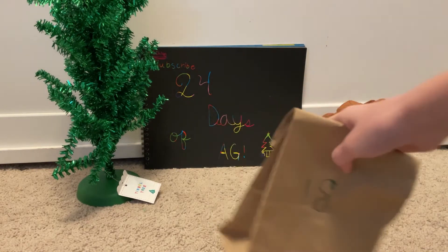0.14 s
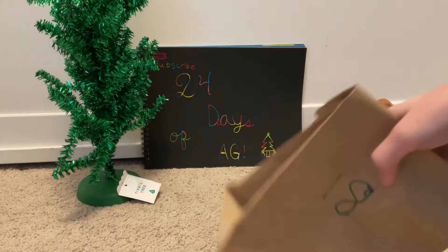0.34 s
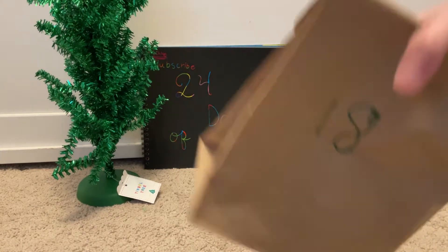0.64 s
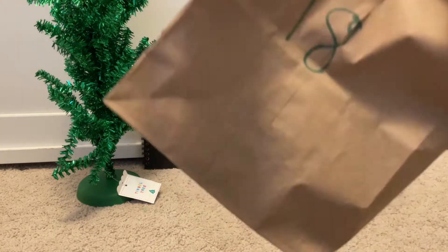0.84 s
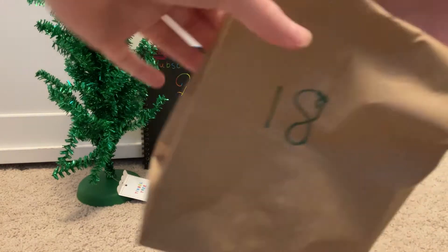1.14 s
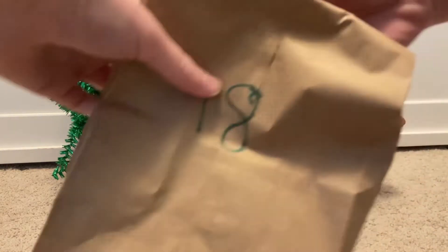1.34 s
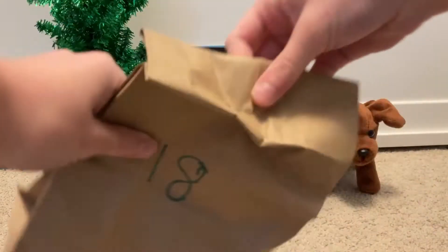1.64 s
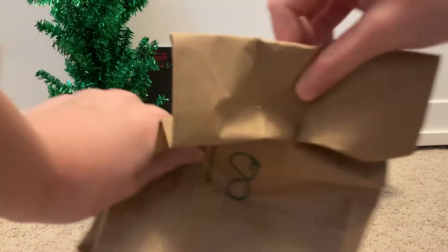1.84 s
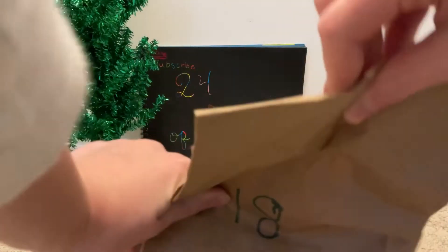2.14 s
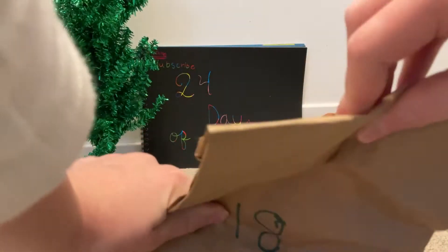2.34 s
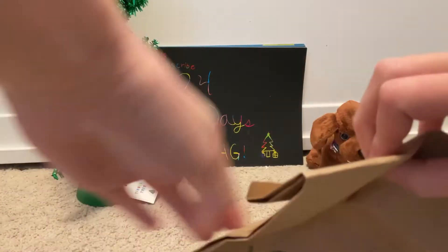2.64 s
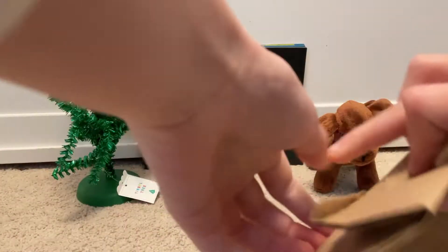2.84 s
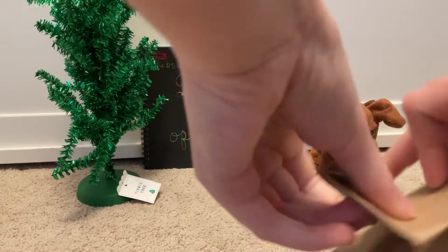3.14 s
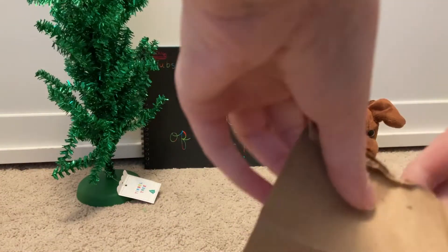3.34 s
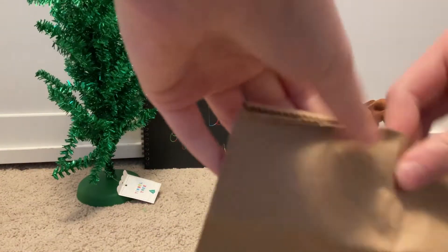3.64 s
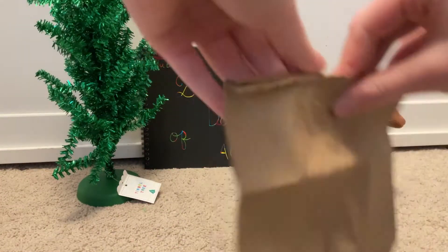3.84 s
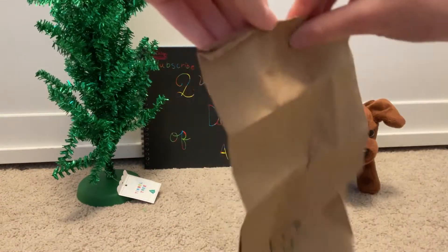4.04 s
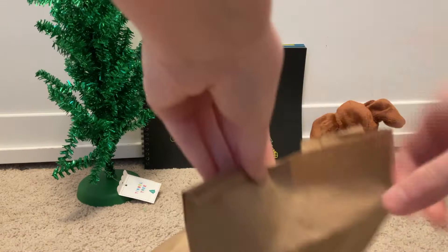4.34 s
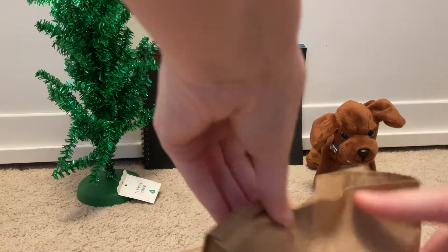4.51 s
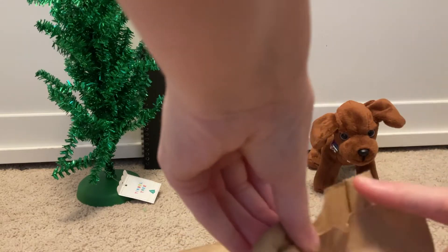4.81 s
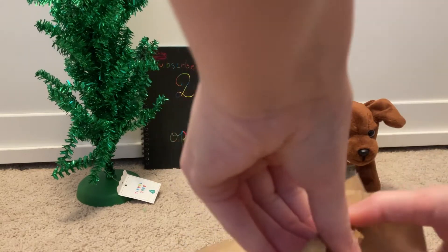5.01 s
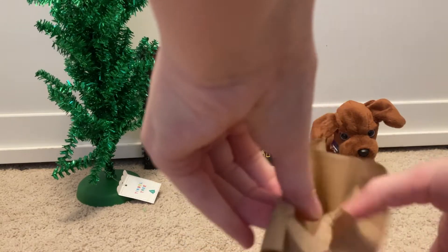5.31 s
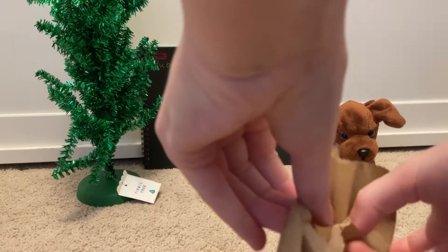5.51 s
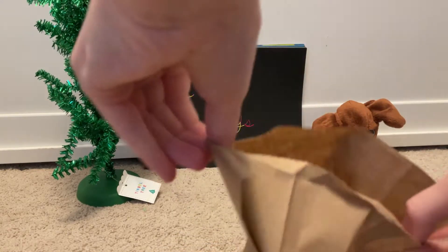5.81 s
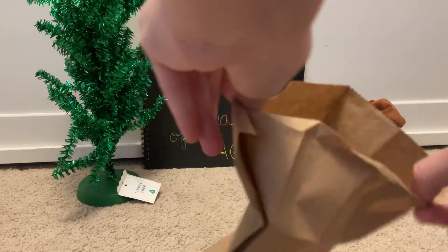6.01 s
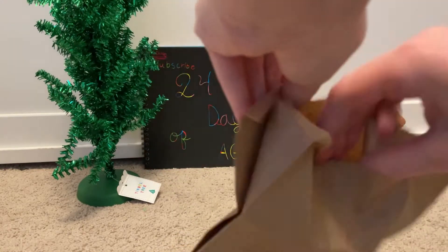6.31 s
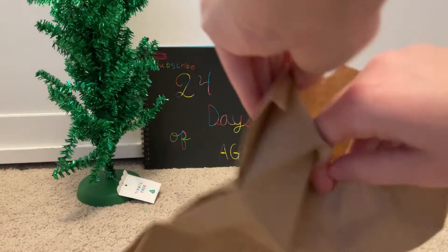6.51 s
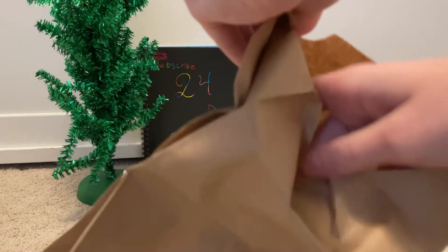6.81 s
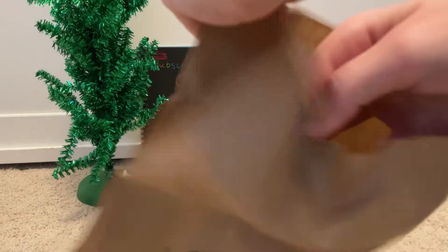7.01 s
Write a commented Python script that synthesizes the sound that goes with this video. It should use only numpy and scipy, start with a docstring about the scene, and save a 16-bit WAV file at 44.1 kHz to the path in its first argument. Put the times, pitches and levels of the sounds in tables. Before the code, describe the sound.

Hands pick up a paper bag with a light sliding hiss and scattered dry cracks. The crackle thickens as the top is unfolded, and the fold springs loose with one sharp snap. The bag is then pulled open in fits, with small crinkles, finger rubs and soft flaps, ending in a run of loud cracks. It is close to the microphone in a quiet, carpeted room.

```python
"""A brown paper bag, close to the microphone in a carpeted room. Hands pick it up with a sliding hiss, and
creases buckle in dry cracks that spread through the sheet as bending waves. The crackle thickens as the
top is unfolded, until at two seconds the fold springs loose with a sharp snap. The bag is then pulled
open in fits: small crinkles and finger strokes fill the gaps, the broad walls flap softly, and a last
run of loud cracks comes near seven seconds."""
import sys
import numpy as np
from scipy import signal
from scipy.fft import rfft, irfft
from scipy.io import wavfile

SR = 44100
rng = np.random.default_rng(int(sys.argv[2]) if len(sys.argv) > 2 else 0)


def generate_wav(signal):
    """Clip the signal to [-1, 1] and save it as 16-bit WAV at the path in sys.argv[1]."""
    frames = np.transpose(np.atleast_2d(signal))
    scaled = np.clip(frames, -1, 1) * 32767
    pcm = np.round(scaled).astype(np.int16)
    wavfile.write(sys.argv[1], SR, pcm)


N = 315932
TIME = np.arange(N) / SR
LEAD_S = .005  # a buckle starts to swell this long before its jump
CRISP_SPREAD_DB = 4.5  # the top octave varies this much between tiny buckles


def cracks(run_s=.0028, small_facet_hz=3200, neighbour_db=-17, neighbour_late_s=.009):
    """Creases give way, trailed by weak neighbours; small facets are crisp, broad ones jerk a panel."""
    # creases buckling: (time [s], level over 10 ms [dB], facet pitch [Hz])
    creases = [(0.1104, -27, 2650), (.141, -31, 2870), (0.194, -29, 2830), (0.2665, -28, 2850),
               (0.6408, -33.5, 3510), (0.821, -28, 1740), (0.854, -22.5, 3000), (.937, -26, 2540),
               (0.956, -25.5, 2150), (1.063, -33, 2650), (1.239, -31, 3000), (1.251, -25, 4460),
               (1.3399, -18.5, 2890), (1.3755, -18, 2900), (1.401, -19.5, 1900), (1.511, -33, 3400),
               (1.535, -28, 4470), (1.551, -24, 4700), (1.609, -26.5, 3640), (1.678, -23.5, 3850),
               (1.7131, -21, 2420), (1.762, -18, 1570), (1.794, -23.5, 3200), (1.7997, -24.5, 3600),
               (1.8433, -24.5, 1540), (1.869, -23, 4900), (1.88, -28, 1710), (1.897, -27.5, 2120),
               (1.945, -35, 1780), (1.993, -28, 3450), (2.1705, -40, 4180), (2.2092, -32, 1710),
               (2.2409, -22, 4430), (2.288, -27.5, 2200), (2.3002, -27, 2580), (2.3428, -23.5, 2950),
               (2.4078, -22.5, 3120), (2.451, -23.5, 3200), (2.5335, -33, 3250), (2.586, -25.5, 2840),
               (2.629, -34.5, 2680), (2.6908, -26, 4170), (2.7518, -35, 3520), (2.772, -28, 2450),
               (2.798, -26.5, 2300), (2.9054, -30.5, 2800), (2.9886, -27.5, 4000), (3.029, -31, 3900),
               (3.039, -28.5, 4200), (3.1414, -29, 3640), (3.3097, -24, 2450), (3.388, -30, 1680),
               (3.4965, -32, 3400), (3.529, -29.5, 2300), (3.57, -31, 1600), (3.629, -23, 3750),
               (3.641, -25.5, 4860), (3.66, -35, 3620), (3.7061, -31.5, 4010), (3.754, -24.5, 4000),
               (3.7828, -28, 3880), (3.792, -25, 3630), (3.8136, -26, 4180), (3.935, -40, 2010),
               (4.1325, -35, 3520), (4.1811, -37.5, 1720), (4.2574, -28.5, 2870), (4.273, -38, 3200),
               (4.354, -23.5, 5000), (4.392, -35, 3600), (4.487, -22.5, 3200), (4.503, -25, 3060),
               (4.5725, -19.5, 3070), (4.911, -29, 2630), (5.136, -29.5, 2680), (5.175, -30.5, 2940),
               (5.243, -27, 4270), (5.2675, -27.5, 4400), (5.3449, -30, 3710), (5.575, -32, 3800),
               (5.6168, -22, 3040), (5.638, -22.5, 2720), (5.646, -24.5, 3080), (5.663, -29.5, 2700),
               (5.706, -32.5, 2380), (5.784, -31.5, 2760), (5.8072, -33, 2040), (5.88, -28, 2840),
               (5.907, -27.5, 2770), (5.953, -34.5, 3250), (6.0116, -27, 2600), (6.148, -33, 2680),
               (6.187, -36.5, 3170), (6.266, -27, 3380), (6.307, -26, 4000), (6.3556, -20, 3570),
               (6.413, -26, 2480), (6.5601, -23.5, 3020), (6.589, -23, 3500), (6.599, -19, 3240),
               (6.6767, -23, 3040), (6.694, -16.5, 2990), (6.704, -18.5, 3430), (6.716, -20.5, 3000),
               (6.831, -22.5, 4400), (6.8627, -24, 2300), (6.968, -19.5, 3370), (7.0105, -15.5, 3250),
               (7.0443, -18.5, 3470), (7.0914, -26, 1670)]
    out = np.zeros(N)
    for s, db, hz in creases:
        broad = 1 / (1 + (hz / small_facet_hz) ** 9.2)  # near 0, the facet jumps almost at once
        crisp_db = 3.5 + 3.5 * np.log2(hz / small_facet_hz)
        knock_db = -39 + .8 * (db + 25)
        add(out, s - LEAD_S, from_db(db) * buckle(hz, run_s * broad, crisp_db))
        add(out, s, np.sqrt(broad) * from_db(knock_db) * panel_knock(hz))
        for late, pitch, crisp in rng.standard_normal((2, 3)):
            neighbour = buckle(hz * 2 ** (pitch / 3 - .5), run_s / 2, CRISP_SPREAD_DB * crisp, size=1024)
            add(out, s - LEAD_S + neighbour_late_s * abs(late), from_db(db + neighbour_db) * neighbour)
    return out


def buckle(hz, run_s, top_db, ring_s=.0013, tail_s=.013, facet_db=4, travel_s=.000746, size=2048):
    """One facet buckles: slips swell, the crease jumps and runs on, the sheet rings out."""
    # tone of cracking paper: (frequency [Hz], level [dB])
    paper_colour = [(60, -26.5), (150, -7.5), (300, -7), (1500, 1.5), (3000, -3), (5000, 1), (7000, -2.5),
                    (9800, -11.5), (13500, -1.5), (16000, -7.5)]
    t = np.arange(size) / SR - LEAD_S
    swell_s = .0012 * np.sqrt(run_s / .002) + 1e-5
    swell = np.exp(np.minimum(t, 0) / swell_s)
    after_s = np.maximum(t - run_s, 0)
    decay = np.exp(-after_s / ring_s) + from_db(-20) * np.exp(-after_s / tail_s)
    # waves scattered by the edges of the sheet have lost some treble; the jumps themselves keep it
    pulse = low_pass(from_db(-12) * swell * decay * rng.standard_normal(size), hz=7000)
    jumps = 1 + int(run_s / ring_s / 2)
    jump_s = LEAD_S + run_s * (np.arange(jumps) + rng.uniform(0, .46, jumps)) / jumps
    pulse[(jump_s * SR).astype(int)] += rng.choice([-1, 1], jumps)
    # a small facet radiates little below its own pitch, a large one little above
    low = low_pass(pulse, hz)
    low_gain = np.clip((2900 / hz) ** 2, .15, 3)
    facet = from_db(facet_db) * resonance(pulse, hz * rng.uniform(.8, 1.2), q=5)
    panel = from_db(-6) * resonance(pulse, hz * rng.uniform(.2, .5), q=5)
    radiated = low_gain * (low + panel) + (pulse - low) + facet
    # the crisper the fibres break, the more of the top octave
    colour = [(f, db + top_db * (f > 8000)) for f, db in paper_colour]
    return unit_burst(bend(coloured(radiated, colour), travel_s * rng.uniform(.5, 1.5)))


def panel_knock(facet_hz):
    """The panel beside a crease is jerked and rings briefly at a hollow pitch, well below the facet's."""
    hz = .211 * facet_hz * rng.uniform(.7, 1.3)
    ring = resonance(signal.unit_impulse(4096), hz, q=6.2)
    return unit_burst(bend(ring, delay_s=.002993))


def snap():
    """The fold tears free in a swelling avalanche of slips."""
    # the fold springing loose: (time [s], level [dB])
    envelope = [(2.005, -54), (2.009, -21.5), (2.014, -22), (2.024, -24.5), (2.028, -11), (2.040, -9),
                (2.043, -17.5), (2.052, -29), (2.062, -29), (2.085, -57)]
    # tone of the snap: (frequency [Hz], level [dB])
    snap_colour = [(60, -23), (250, -7), (750, 1.5), (2000, -2), (4500, -1.5), (9500, -12.5),
                   (14000, -11.5)]
    level_db, = in_time(envelope)
    running = (TIME > envelope[0][0]) & (TIME < envelope[-1][0])
    slips = coloured(clicks(per_s=5000, spread_db=5), snap_colour)
    return running * from_db(level_db) * rms_one(bend(slips, delay_s=.00094))


def pings(t60=.015):
    """A facet held taut cracks and rings on at one pitch."""
    # the taut facet: (time [s], level over 10 ms [dB], pitch [Hz])
    taut_facets = [(1.0148, -28, 3340),]
    out, t = np.zeros(N), TIME[:SR // 10]
    for s, db, hz in taut_facets:
        ring = np.sin(2 * np.pi * hz * t) * from_db(-60 * t / t60)
        add(out, s - LEAD_S, from_db(db - 4) * buckle(hz, run_s=.00078, top_db=-1))
        add(out, s, from_db(db) * unit_burst(ring))
    return out


def crinkles(rustle_db, low_hz=1200, high_hz=4300, facets=40):
    """Tiny buckles cluster, each at its facet's pitch; harder handling makes them denser and brighter."""
    per_s = 200 * from_db(.3 * (rustle_db + 38))
    slips = clicks(per_s, spread_db=4) * from_db(rustle_db) * grip(rough_db=1.5)
    rings = []
    for hz in np.geomspace(low_hz, high_hz, facets):
        ring = buckle(hz, run_s=rng.uniform(0, .0036), top_db=rng.normal(.5, CRISP_SPREAD_DB), facet_db=9)
        rings.append(ring / np.linalg.norm(ring))
    out, facet_at = np.zeros(N), rng.integers(facets, size=N)
    for at in np.flatnonzero(slips):
        add(out, max(at / SR - LEAD_S, 0), slips[at] * rings[facet_at[at]])
    soft = low_pass(out, high_hz)
    brightness = np.minimum(from_db(.8 * (rustle_db + 40)), 1)
    return soft + brightness * (out - soft)


def sliding(rustle_db, panel_hz=755):
    """Fibres catch and hiss: fingers make the held panel sing, paper rubs on paper in duller fits."""
    # fingers sliding over the paper: (peak time [s], level [dB], time to rise 10 dB [s])
    strokes = [(0.05, -41.5, 0.44), (0.36, -39.5, 0.12), (2.9, -41, .1), (3.1, -41.5, 0.16),
               (4.115, -41.5, 0.09), (4.47, -34, .07), (5.06, -35.5, 0.21), (5.54, -40, 0.13),
               (6.48, -36, 0.21), (6.93, -41.5, 0.2)]
    # tone of the hiss: (frequency [Hz], level [dB])
    hiss_colour = [(100, -19), (400, 3.5), (4500, 6), (9500, -9), (14000, 1)]
    hiss = rms_one(coloured(clicks(per_s=5000, spread_db=5), hiss_colour))
    singing = from_db(6) * resonance(hiss, panel_hz, q=12)
    stroked = swells(strokes, release_share=.62, roundness=1.28) * (hiss + singing)
    rubbed = from_db(-50 + .7 * (rustle_db + 38)) * low_pass(hiss, hz=5500)
    return grip(rough_db=3) * stroked + grip(rough_db=4) * rubbed


def wall_flutter(flutter_db):
    """The broad sides of the bag flutter and knock as long as it is handled."""
    # tone of the fluttering sides: (frequency [Hz], level [dB])
    flutter_colour = [(35, -54), (70, -8), (140, -4), (300, -1), (750, -3), (4000, -48)]
    slips = coloured(clicks(per_s=180, spread_db=4.5), flutter_colour)
    flutter = rms_one(bend(slips, delay_s=.002005))
    return from_db(flutter_db) * (from_db(-2.5) * flutter + from_db(-4) * wall_knocks())


def wall_knocks(low_hz=290, high_hz=800, panels=14):
    """Each slip of a wall makes one stiff panel ring briefly at a hollow pitch of its own; rms 1."""
    slips = clicks(per_s=110, spread_db=6.5)
    panel_at = rng.integers(panels, size=N)
    pitches = np.geomspace(low_hz, high_hz, panels)
    rings = (resonance(slips * (panel_at == k) + 1e-18, hz, q=8.5) for k, hz in enumerate(pitches))
    return rms_one(sum(rings))


def wall_flaps(ring_s=.0046, size=4096):
    """Now and then a wall of the bag flips over with a soft falling thud."""
    # walls flipping: (time [s], level over 10 ms [dB])
    flaps = [(.478, -31), (0.499, -36.5), (0.548, -33), (1.056, -33.5), (2.033, -21.5), (3.304, -35),
             (5.638, -29.5), (6.715, -38), (6.959, -30.5), (7.087, -30.5)]
    # tone of the thud: (frequency [Hz], level [dB])
    thud_colour = [(32, -41), (70, -1), (260, -1), (450, -2.5), (800, -21), (4000, -60)]
    out = np.zeros(N)
    for s, db in flaps:
        push = from_db(-25) * rng.standard_normal(size) * np.exp(-TIME[:size] / ring_s)
        push[0] = 1  # the flip itself, ahead of its faint scatter
        thud = bend(coloured(push, thud_colour), delay_s=.00415)
        add(out, s, from_db(db) * unit_burst(thud))
    return out


def handling(release_share=.71, roundness=2.1):
    """Hands squeeze and shift the bag, setting the levels of rustle and wall flutter in dB."""
    # squeezes and pulls: (peak time [s], rustle [dB], wall flutter [dB], time to rise 10 dB [s])
    squeezes = [(0.215, -43.5, -45, 0.18), (0.378, -39.5, -52, 0.16), (0.935, -33.5, -38, 0.06),
                (1.242, -31.5, -36.5, 0.09), (1.383, -29.5, -34, 0.0644), (1.462, -29, -42, 0.05),
                (1.575, -23.5, -35.5, 0.08), (1.751, -27, -41, 0.07), (1.883, -32.5, -46, 0.07),
                (2.284, -30.5, -33, -0.02), (2.433, -29, -36.5, 0.0639), (2.796, -30.5, -44, 0.0547),
                (3.237, -31, -36.5, 0.0532), (3.624, -33.5, -40.5, 0.11), (4.14, -44.5, -52, 0.12),
                (4.485, -27, -42, 0.0925), (4.9, -40, -50, 0.04), (5.651, -28.5, -40, 0.05),
                (5.96, -39.5, -44, 0.15), (6.284, -27, -37, 0.0524), (6.425, -37.5, -43, 0.18),
                (6.587, -25, -41.5, 0.05), (6.72, -21, -30.5, 0.0455), (6.823, -25.5, -37, 0.08),
                (6.981, -27, -37, 0.0751), (7.16, -28.5, -60, 0.07)]
    # the bag shifting between squeezes: (time [s], rustle [dB], wall flutter [dB])
    carrying = [(0.0, -42, -52.5), (.5, -47, -49), (0.73, -43, -49), (0.80, -69, -61), (0.84, -40, -39.5),
                (1.11, -54, -48), (1.25, -36, -42.5), (1.91, -37, -41), (1.97, -48.5, -55.5),
                (3.21, -45, -52), (3.8, -45.5, -48.5), (4.0, -61.5, -72), (4.3, -57, -51.5),
                (4.62, -43.5, -53), (4.8, -48, -58), (5.15, -38.5, -46.5), (5.34, -41, -52),
                (5.40, -59, -58.5), (5.71, -37, -41.5), (5.83, -54.5, -57), (7.16, -39, -40.5)]
    rustle_db, flutter_db = in_time(carrying)
    rustle = swells([(s, db, rise_s) for s, db, _, rise_s in squeezes], release_share, roundness)
    flutter = swells([(s, db, rise_s) for s, _, db, rise_s in squeezes], release_share, roundness)
    return 20 * np.log10([np.hypot(rustle, from_db(rustle_db)), np.hypot(flutter, from_db(flutter_db))])


def swells(movements, release_share, roundness):
    """Gain of hand movements: each builds up and lets go in a share of that time; roundness 2 is a bell."""
    t = TIME[::64]
    power = 0
    for s, db, rise_s in movements:
        from_peak = np.maximum(s - t, (t - s) / release_share) / abs(rise_s)
        power = power + from_db(db - 10 * np.minimum(from_peak ** roundness, 10)) ** 2
    return np.interp(TIME, t, np.sqrt(power))


def grip(rough_db, per_s=45):
    """Paper sticks and gives way in fits: a gain that wanders quickly, with mean power 1."""
    knots = np.clip(rng.standard_normal(int(N / SR * per_s) + 2), -2, 1.3)
    return rms_one(from_db(rough_db * np.interp(TIME * per_s, np.arange(len(knots)), knots)))


def treble_drift(x, split_hz=8700):
    """The top octave slowly grows brighter and duller."""
    # the paper's top octave: (time [s], gain [dB])
    treble = [(0.0, -11), (1.1, -2), (1.7, 0.5), (3.4, 4), (4.4, 1.5), (5.2, 2), (6.1, -2.5), (7.16, 1.5)]
    treble_db, = in_time(treble)
    low = low_pass(x, split_hz)
    return low + from_db(treble_db) * (x - low)


def cavity(paper):
    """The air in the bag resonates with the paper around it."""
    # air resonances: (frequency [Hz], width [Hz], gain [dB])
    modes = [(242, 36, -2), (432, 14, -11)]
    return sum(from_db(db) * resonance(paper, hz, q=hz / width) for hz, width, db in modes)


def reflections(x, t60=.14, first_s=.005, thicken_s=.041, wet_db=-24, size=16384):
    """Sparse early reflections, faint this close, thicken into a short tail that the carpet swallows."""
    # tone of the reflected sound: (frequency [Hz], level [dB])
    room_colour = [(60, -9), (250, 11.5), (4000, 5.5), (12000, -4)]
    t = TIME[:size]
    density = np.minimum(.0048 + (t / thicken_s) ** 2, 1)
    arrives = (rng.random(size) < density) & (t > first_s)
    echoes = rng.standard_normal(size) * arrives / np.sqrt(density)
    response = coloured(echoes * from_db(-60 * t / t60), room_colour)
    return from_db(wet_db) * signal.oaconvolve(x, response / np.linalg.norm(response))[:N]


def room_tone(level_db=-68):
    """The faint, steady hiss of the still room."""
    # room tone: (frequency [Hz], level [dB])
    still_colour = [(25, -35), (70, -1), (250, -3), (5000, 2)]
    return from_db(level_db) * rms_one(coloured(rng.standard_normal(N), still_colour))


def clicks(per_s, spread_db):
    """Random slips of uneven size and sign; mean power 1."""
    sizes = from_db(spread_db * np.minimum(rng.exponential(1, N), 3)) * rng.choice([-1, 1], N)
    slipping = rng.random(N) < per_s / SR
    return rms_one(sizes * slipping / np.sqrt(per_s))


def bend(x, delay_s):
    """Bending waves speed up with the root of frequency, so lows arrive late; delay_s holds at 1 kHz."""
    f = np.fft.rfftfreq(2 * len(x), 1 / SR)
    phase = 4 * np.pi * delay_s * np.sqrt(1000 * f)
    return irfft(rfft(x, 2 * len(x)) * np.exp(-1j * phase))[:len(x)]


def coloured(x, points, size=4096):
    """Causal (minimum-phase) filter that follows a spectrum."""
    hz, db = np.transpose(points)
    f = np.maximum(np.fft.rfftfreq(size, 1 / SR), 1)
    gain = from_db(np.interp(np.log(f), np.log(hz), db))
    cepstrum = irfft(np.log(gain))
    cepstrum[1:size // 2] *= 2
    cepstrum[size // 2 + 1:] = 0
    return signal.oaconvolve(x, irfft(np.exp(rfft(cepstrum))))[:len(x)]


def resonance(x, hz, q):
    """One peak of gain 1."""
    return signal.lfilter(*signal.iirpeak(min(hz, .4 * SR), max(q, 1), fs=SR), x)


def low_pass(x, hz):
    """A gentle roll-off."""
    return signal.lfilter(*signal.butter(1, min(hz, .4 * SR), fs=SR), x)


def from_db(db):
    return 10 ** (np.asarray(db) / 20)


def rms_one(x):
    return x / np.sqrt(np.mean(x ** 2) + 1e-20)


def unit_burst(x):
    """Scale a short sound to the energy of 10 ms at rms 1."""
    return x * np.sqrt(SR / 100 / np.sum(x ** 2))


def in_time(rows):
    """Each column of a curve at every sample."""
    s, *columns = np.transpose(rows)
    return [np.interp(TIME, s, column) for column in columns]


def add(out, s, sound):
    """Mix a sound in at a time."""
    at = int(s * SR)
    out[at:at + len(sound)] += sound[:N - at]


def scene():
    """The bag close to one microphone, its reflections and the still room behind."""
    rustle_db, flutter_db = handling()
    crackle = treble_drift(cracks() + pings() + crinkles(rustle_db) + sliding(rustle_db))
    paper = crackle + wall_flutter(flutter_db) + wall_flaps() + snap()
    bag = paper + cavity(paper)
    return (bag + reflections(bag) + room_tone())[None]


def record(dry, ceiling=.9, cutoff_hz=16300):
    """The highest peaks are rounded, the top is cut."""
    rounded = ceiling * np.tanh(dry / ceiling)
    return signal.sosfilt(signal.ellip(10, .2, 70, cutoff_hz, fs=SR, output="sos"), rounded)


dry = scene()
out = record(dry)
generate_wav(out)
```